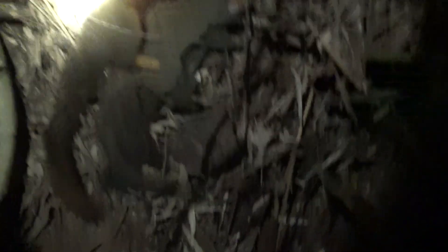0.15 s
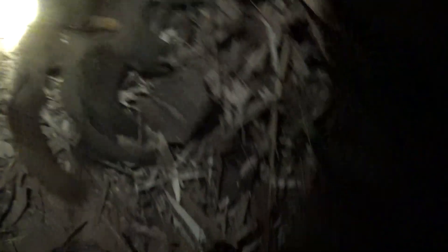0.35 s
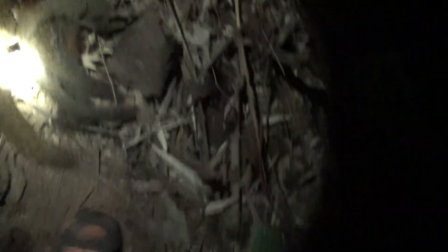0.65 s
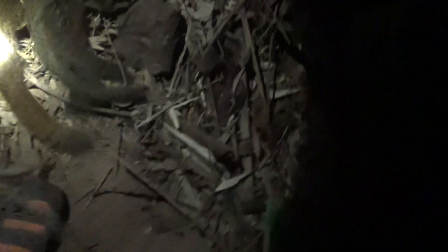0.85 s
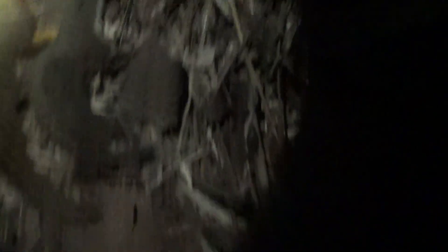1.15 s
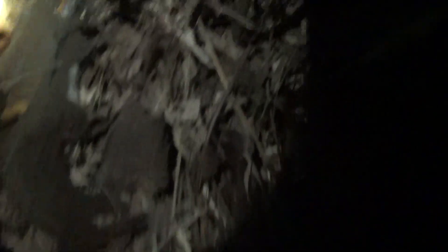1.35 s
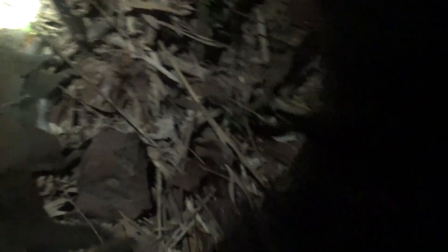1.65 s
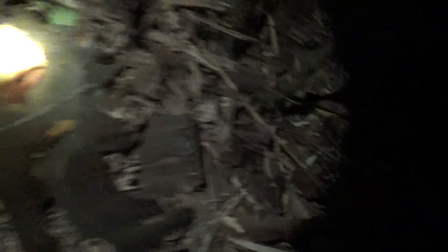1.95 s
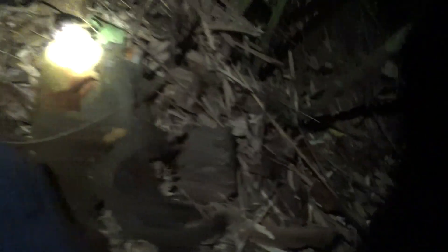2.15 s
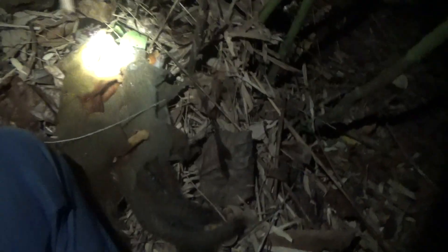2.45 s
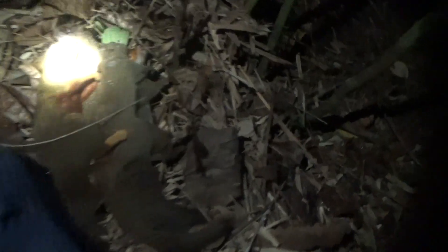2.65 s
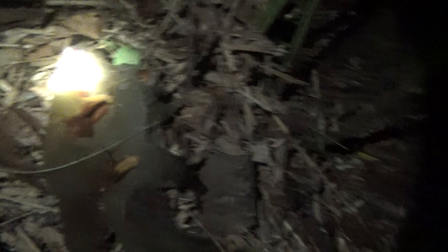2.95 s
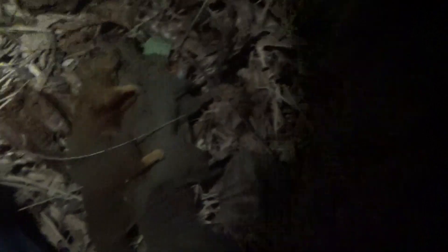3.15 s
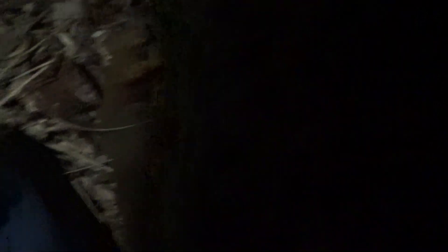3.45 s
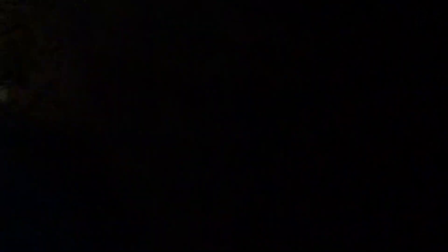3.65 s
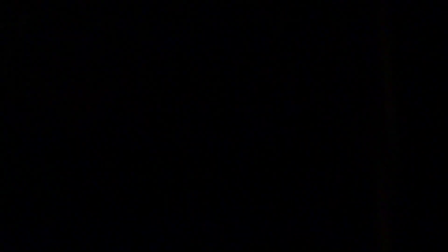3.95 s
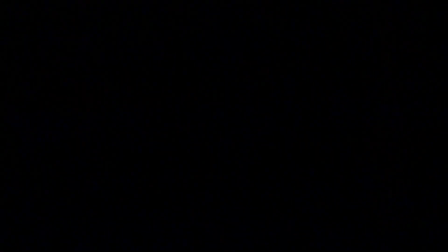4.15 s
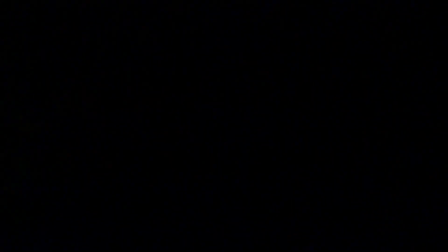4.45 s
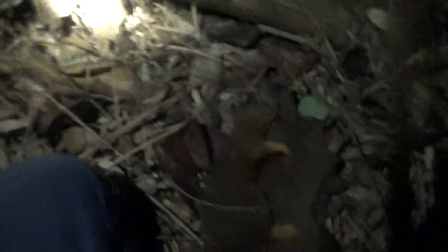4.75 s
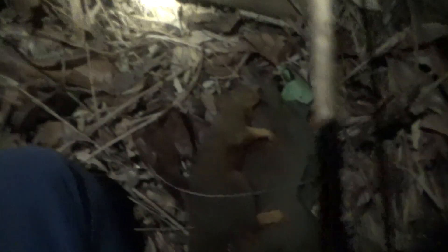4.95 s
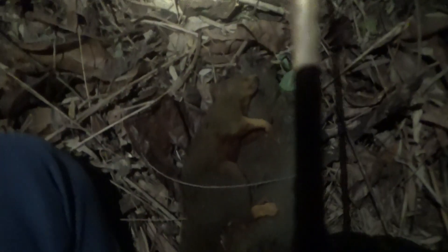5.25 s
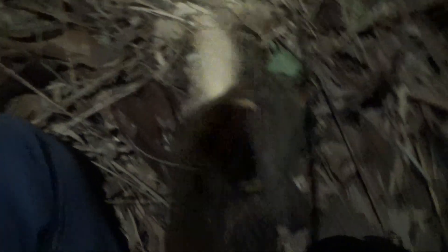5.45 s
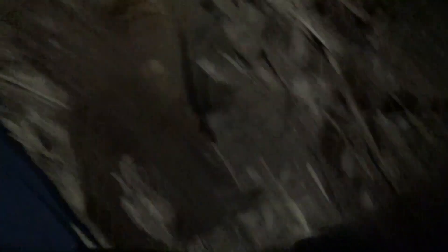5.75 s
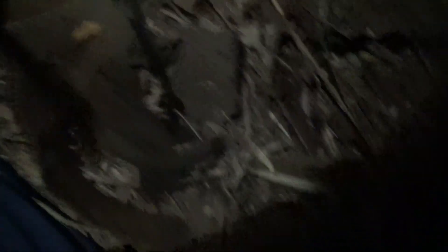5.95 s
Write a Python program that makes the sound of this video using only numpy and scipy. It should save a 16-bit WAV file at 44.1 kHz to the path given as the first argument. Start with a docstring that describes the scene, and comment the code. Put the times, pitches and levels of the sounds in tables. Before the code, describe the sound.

A night forest heard close to the ground in stereo. Crickets trill throughout, a bright, rapidly pulsing note around 4 to 5 kHz, swelling and dipping slightly, with a fainter slower chirr below and diffuse tree echoes. From 0 s dry leaf litter rustles in short, crowded bursts, crisp hiss mixed with crunch, as someone shifts about. Dull soft bumps come at 0.1-0.25 s; twig knocks cluster at 1.4-1.95 s, and the strongest crunches and rustles fall around 2.0-2.6 s. Around 3.0 s there is a tick and low bump, then a brief hollow scrape of a stick at 3.2-3.45 s with ringing stem taps. From 3.6 to 4.6 s the litter is nearly still, only tiny ticks under louder crickets. Muffled bumps and light rustling return at 5.0-5.35 s, and at 5.9-6.1 s leaves crunch sharply with knocks. Soft air and far insects lie beneath.

```python
"""Crickets trill throughout in a forest at night: wing strokes ring gliding tones, smeared by sparse tree echoes.
From the start dry leaf litter, grainy coloured noise, rustles in crowded bursts as someone shifts about,
with ticks, twig knocks, ringing stems and dull bumps, each a decaying resonance blurred by noise.
After three seconds a stick scrapes a hollow thing and the litter calms; towards the end it stirs again.
Far insects and air, a random spectrum with drifting patches, lie under it all."""
import sys
import numpy as np
from scipy import signal
from scipy.io import wavfile
from scipy.ndimage import uniform_filter1d

SR = 44100
rng = np.random.default_rng(int(sys.argv[2]) if len(sys.argv) > 2 else 0)


def int16_out(signal):
    """Quantize to a 16-bit WAV file."""
    q = np.round(np.clip(np.atleast_2d(signal).T, -1, 1) * 32767)
    wavfile.write(sys.argv[1], SR, q.astype(np.int16))


N = 269847
T = np.arange(N) / SR  # s


def gain_of(db):
    """Decibel law: 20 dB is a tenfold amplitude."""
    return 10 ** (np.asarray(db) / 20)


def evened(x):
    """Normalization to unit root-mean-square amplitude."""
    return x / np.sqrt(np.mean(x ** 2) + 1e-20)


def read(points, hz):
    """Interpolation of a spectrum along logarithmic frequency."""
    f, value = np.transpose(points)
    return np.interp(np.log(hz + 1), np.log(f + 1), value)


def columns(rows):
    """Linear interpolation of each column over the time in the first."""
    s, *rest = np.transpose(rows)
    return [np.interp(T, s, c) for c in rest]


def sides(db):
    """Stereo placing by level difference: gains of left and right, left louder by db."""
    return gain_of([db / 2, -db / 2])


def colour(x, spectrum):
    """Minimum-phase filtering: gives x a spectrum while clicks keep a sharp front."""
    log_gain = np.log(gain_of(read(spectrum, abs(np.fft.fftfreq(4096, 1 / SR)))))
    # the Hilbert transform of the log gain is the phase of a causal filter
    response = np.exp(np.conj(signal.hilbert(log_gain)))
    taps = np.fft.ifft(response).real[:2048]
    return evened(signal.oaconvolve(x, taps[None], axes=1)[:, :N])


def crickets():
    """Superposition of singers: a near chorus, a slower pair below and a faint high one, direct and echoed."""
    # near chorus: t/s, level/dB, leader against its neighbours/dB
    chorus = [(0.0, -20, 4), (0.46, -24, 2), (0.95, -26, 4), (1.45, -27.5, -9), (1.79, -19.5, 1),
              (2.11, -20.5, 2.5), (2.57, -17, 0.5), (2.99, -20.5, 2), (3.56, -21.5, 1.5), (3.78, -28, 2.5),
              (4.6, -17.5, 2.5), (5.03, -15.5, 1), (5.52, -16.5, 8.5), (5.68, -18.5, 1), (5.9, -20.5, -2),
              (6.12, -26.5, 9)]
    # neighbours singing in turn with the leader: delay/strokes, level/dB, pitch factor
    neighbours = [(.5, -1, .985), (.27, -5, .95), (.74, -5, 1.0), (.9, -6, .9)]
    # lone singers before their path gains: t/s, slow pair level/dB, high cricket level/dB
    others = [(0, -38, -32.5), (1.3, -33, -35), (2.5, -33.5, -37), (3.3, -36, -38), (4.3, -34, -32.5),
              (5.4, -30.5, -32), (6.12, -33, -34)]
    # chorus as the listener turns: t/s, top of the leader's note f/Hz, left over right/dB
    turn = [(0.2, 4750, 2), (1.4, 4695, 0), (2.2, 4776, -0.5), (3.6, 4739, -1), (4.5, 4700, 1.5),
            (5.4, 4759, .5), (5.9, 4710, 0)]
    # stepwise pace of the leader: from t/s, wing strokes per second
    pace = [(0, 37.38), (.6, 37.9), (1.2, 37.29), (2.1, 36.12), (2.7, 36.97), (3.3, 35.43), (3.6, 36.64),
            (4.8, 36.32), (5.4, 36.85)]
    level_db, leader_db = columns(chorus)
    slow_db, high_db = columns(others)
    top_hz, pan_db = columns(turn)
    since, per_s = np.transpose(pace)
    per_s_now = per_s[np.searchsorted(since, T, "right") - 1]
    strokes = .58 + np.cumsum(per_s_now) / SR  # part of a stroke is already made at the start

    song = dict(duty=.62, bend=2.3, slip=.012, uneven_db=1.48)
    leader = cricket(strokes, top_hz, drop_hz=598.6, octave_db=-16.5, **song)
    main = gain_of(leader_db) * leader * np.ones((2, 1))
    for behind, db, pitch in neighbours:
        drift = .15 * np.sin(2 * np.pi * (rng.uniform(.3, .7) * T + rng.random()))  # strokes
        voice = cricket(strokes + 1 - behind + drift, top_hz * pitch, drop_hz=800, octave_db=-17.5, **song)
        # an interaural delay of up to two samples places it
        main += gain_of(db) * np.array([voice, np.roll(voice, rng.integers(-2, 3))])
    echoes = trees(main, t60=0.4)
    main = main + gain_of(-2.5) * (echoes + 0.15 * echoes[::-1])
    running_rms = np.sqrt(uniform_filter1d((main ** 2).mean(0), 9000))
    main = main / running_rms * gain_of(level_db) * sides(pan_db)

    slow = cricket(11.9 * T + .45, 3430, drop_hz=150, duty=.85, bend=.4, early=1.0, flat=.4,
                   slip=.017, uneven_db=1.2)
    slow += .7 * cricket(12.6 * T, 3500, drop_hz=130, duty=.85, bend=.4, slip=.022)  # farther off
    high = cricket(strokes + .4, 5120, drop_hz=90, duty=.7, bend=1.2, slip=.009)
    lone = (slow * gain_of(slow_db) + high * gain_of(high_db))[None]
    return main + gain_of(-9.0) * lone + gain_of(-6.0) * trees(lone, t60=.6)


def cricket(strokes, top_hz, drop_hz, duty, bend=1.8, early=0.95, flat=0.54, slip=0.01989, uneven_db=3.0,
            octave_db=-40):
    """Stridulation: each closing of the wings rings a note that sags as the scraper slows, with a weak octave."""
    along = np.clip(strokes % 1 / duty, 0, 1)  # progress through the closing
    level_db, pitch = rng.standard_normal((400, 2))[np.floor(strokes).astype(int) + 2].T
    slips = evened(uniform_filter1d(rng.standard_normal(N), 40))  # the scraper crosses the teeth unevenly
    hz = (top_hz - drop_hz * along ** bend) * (1 + slip * (pitch / 3 + slips))
    turns = np.cumsum(hz) / SR
    shape = abs(np.sin(np.pi * along ** early)) ** flat * (along < 1)
    shape = shape * gain_of(uneven_db * level_db)
    octave = gain_of(octave_db) * (0.29 + along ** 2) * np.sin(4 * np.pi * turns)  # grows along the stroke
    return evened(shape * (np.sin(2 * np.pi * turns) + octave))


def trees(x, t60):
    """Scattering: sparse echoes of random sign off trunks and leaves, unlike in each ear, vary as one sways."""
    out = np.zeros((2, N))
    for k in range(3):  # three echo patterns, modulated in turn
        at = np.arange(100, SR // 3, 20) + rng.integers(0, 20, (2, (SR // 3 - 81) // 20))
        taps = np.zeros((2, SR // 3 + 20))
        echo = rng.choice([-1., 1.], at.shape) * gain_of(-60 * at / SR / t60)
        np.put_along_axis(taps, at, echo, 1)
        sway = np.sqrt(2 / 3) * np.cos(2 * np.pi * (.9 * T + k / 3))
        out += signal.oaconvolve(x * sway, taps / np.linalg.norm(taps[0]), axes=1)[:, :N]
    return out


def rustle():
    """Friction and fracture of leaves: crisp hiss and crunch, both with ringing cracks, and low scuff."""
    # spectra of crisp hiss, crunch and low scuff: f/Hz, relative level/dB
    hiss_spectrum = [(600, -56), (3000, -12.5), (5500, -7), (7000, -1.5), (8800, 4.5), (10500, -1),
                     (13000, -10.5), (15800, -17.5)]
    crunch_spectrum = [(200, -39), (600, -8.5), (1200, 0), (2000, 0), (3000, 0.5), (5000, -1.5), (8000, -3),
                       (15800, -46)]
    scuff_spectrum = [(25, -39), (60, -12.5), (180, -0.5), (380, 8), (600, -3), (1000, -3), (3000, -87)]
    chip_hz = np.geomspace(6000, 11000, 5)  # small chips that break off
    leaf_hz = np.geomspace(700, 3700, 7)  # leaves of different size
    hiss, crunch, scuff = stirred()
    crisp = colour(grains(6000, spread_db=7.0, apart=0.13), hiss_spectrum)
    crisp = crisp + gain_of(-8.5) * cracking(900, 5.0, chip_hz)
    crushed = colour(grains(3000, spread_db=4.5, apart=0.59), crunch_spectrum)
    crushed = crushed + gain_of(-3.5) * cracking(1800, 5.1, leaf_hz)
    crushed = crushed * gain_of(3.5) * sides(2.1)[:, None]
    scuffed = colour(grains(300, spread_db=1.5, apart=0.09), scuff_spectrum)
    return crisp * hiss + crushed * crunch + scuffed * scuff


def stirred():
    """Addition of powers: every stir swells to its peak and sinks again over the settling of the litter."""
    # stirs before the mix: peak t/s, rise/s, fall/s, hiss level/dB, crunch level/dB, scuff level/dB
    stirs = [(0.0, .05, 0.1, -22, -29.5, -58), (.13, 0.13, 0.22, -30, -36.5, -80),
             (.26, 0.11, 0.051, -25.5, -28, -32), (.34, 0.094, 0.091, -29.5, -35, -41.5),
             (0.542, 0.11, 0.072, -22, -27, -38), (.7, 0.16, 0.6, -26, -33, -45),
             (0.861, 0.12, 0.071, -27.5, -24, -31.5), (1.29, 0.33, 0.16, -23, -33, -63),
             (1.7, 0.035, 0.049, -28, -30, -40), (1.791, 0.028, 0.023, -51, -27, -34),
             (2.01, 0.06, 0.068, -24, -20, -36.5), (2.14, 0.15, 0.12, -36, -27.5, -32),
             (2.26, 0.36, 0.051, -30, -30, -35), (2.436, 0.13, 0.1, -16.5, -25.5, -31.5),
             (2.58, 0.073, 0.083, -20, -26, -32), (2.76, 0.12, 0.1, -28.5, -33.5, -41.5),
             (2.89, 0.071, 0.19, -30.5, -34.5, -36.5), (3.02, 0.067, 0.11, -33.5, -36, -48),
             (3.22, 0.24, 0.18, -57, -37.5, -41.5), (3.7, 0.086, 0.41, -59, -55, -39),
             (3.95, 0.19, 0.39, -49, -40, -60), (4.67, 0.043, 0.2, -37.5, -45.5, -48),
             (5.17, 0.4, 0.26, -33.5, -38.5, -41.5), (5.332, 0.028, 0.027, -45, -31.5, -27.5),
             (5.499, 0.019, 0.053, -49, -36, -49), (5.87, 0.2, 0.052, -34.5, -35, -36.5),
             (6.047, 0.016, 0.072, -25, -21.5, -29.5)]
    # faint settling between stirs before the mix: t/s, hiss level/dB, crunch level/dB, scuff level/dB
    settling = [(.4, -56, -50, -41), (1.0, -35.5, -42.5, -45.5), (1.9, -33, -38, -44), (3.1, -47, -44, -47),
                (4.4, -41.5, -53, -59), (5.5, -42.5, -49, -54.5), (6.12, -35, -44, -39)]
    drop_db, roundness = 19.5, 1.505  # drop one rise or fall time from the peak; 1 = pointed, 2 = round
    power = gain_of(columns(settling)) ** 2
    for s, rise_s, fall_s, *peak_db in stirs:
        away = np.where(T < s, (s - T) / rise_s, (T - s) / fall_s)
        envelope = gain_of(-drop_db * away ** roundness)
        power = power + gain_of(peak_db)[:, None] ** 2 * envelope ** 2
    return np.sqrt(power)


def unequal_snaps(per_s, spread_db):
    """Random impulse process: independent snaps of very unequal size."""
    size_db = spread_db * np.minimum(rng.exponential(1, N), 3.2)
    return (rng.random(N) < per_s / SR) * rng.standard_normal(N) * gain_of(size_db)


def grains(per_s, spread_db, apart):
    """Granular friction: tiny snaps over a smooth rub, with a part that is uncorrelated between the ears."""
    both = evened(unequal_snaps(per_s, spread_db)) + 0.8 * rng.standard_normal(N)
    return both + apart * rng.standard_normal((2, N))


def cracking(per_s, spread_db, notes):
    """Impulse excitation of resonators: sparse cracks each ring briefly at one of the notes."""
    size = unequal_snaps(per_s, spread_db)
    piece, out = rng.integers(0, len(notes), N), 0
    for k, hz in enumerate(notes):
        ring = signal.iirpeak(hz, 2.83, fs=SR)
        out = out + signal.lfilter(*ring, signal.lfilter(*ring, size * (piece == k)))
    return evened(out)


def leaf_ticks():
    """Brittle fracture: leaf ticks ring high, brief and noisy."""
    # ticks before filtering: t/s, level/dB, centre f/Hz
    ticks = [(0.0105, -11.5, 9850), (0.267, -6, 5700), (1.167, -6, 8700), (1.207, -7, 9400),
             (1.415, -11, 6900), (1.423, -7.5, 8460), (1.9497, -8.5, 9550), (2.904, -10, 8700),
             (2.941, -9, 8600), (2.9692, -1, 8590), (3.2054, -7.5, 9500), (3.2165, -14, 8650),
             (3.239, -11.5, 9550), (3.265, -8.5, 7800), (3.8076, -9, 9800), (4.0974, -14, 6360),
             (4.124, -14, 8060), (4.2446, -11, 8900), (4.9686, -16, 6870), (5.152, -9, 7250),
             (5.154, -3.5, 8750), (5.223, -8.5, 9100), (5.291, -11.5, 7770), (5.875, -14, 9300),
             (5.9236, -3, 8700), (5.9484, -16, 5700), (6.0232, -8, 6160), (6.108, -9, 5760)]
    return hits(ticks, noisy=1.8, rise_s=.0002, cycles=55., top=1.1, pan_db=-.3)


def twig_knocks():
    """Impact excitation: twigs knocked or snapped ring behind a broad crack."""
    # knocks before filtering: t/s, level/dB, ring f/Hz
    knocks = [(.692, -19, 1240), (.71, -16.5, 1730), (0.8513, -11, 1070), (1.4305, -10.5, 2700),
              (1.4744, -20, 1750), (1.7034, -20, 1560), (1.7513, -8.5, 2250), (1.7718, -12, 2570),
              (1.7877, -12, 2080), (1.7978, -15.5, 920), (1.8646, -14, 3020), (1.941, -3, 3340),
              (2.6268, -18, 1950), (2.944, -17.5, 1130), (3.0244, -11, 2930), (3.199, -18, 1740),
              (3.2245, -12, 2200), (3.292, -24, 1910), (3.3377, -23, 2120), (5.176, -13.5, 2530),
              (5.334, -20, 920), (5.485, -19.5, 2000), (5.9238, -12, 1690), (5.9493, -16, 2140),
              (6.023, -8, 2130), (6.027, -11, 880), (6.041, -10, 2260), (6.056, -20, 1460),
              (6.108, -14, 2220)]
    return hits(knocks, noisy=.8, rise_s=0.0002, cycles=22.0, top=2.5, pan_db=4.0, crack_db=-9)


def stem_taps():
    """Light damping: hollow dry stems ring clearly when tapped."""
    # taps before filtering: t/s, level/dB, ring f/Hz
    stems = [(1.4455, -14.5, 1660), (3.2698, -7, 1830), (3.4515, -11.5, 2600), (3.5128, -9, 2440),
             (4.063, -10.5, 3080)]
    return hits(stems, noisy=.15, rise_s=0.0003, cycles=40.0, top=2.5, pan_db=3.0, crack_db=-6)


def dull_bumps():
    """Soft contact: bumps of the hand and of feet on soil start slowly and ring low."""
    # bumps before filtering: t/s, level/dB, f/Hz
    bumps = [(.13, -14.5, 468), (.24, -15, 432), (.88, -34, 35), (1.57, -34, 90), (1.793, -17.5, 555),
             (3.02, -12, 504), (3.2, -27, 79.5), (3.94, -29, 65.6), (4.813, -28.5, 279),
             (4.968, -15.5, 385), (5.155, -18, 433), (5.282, -15, 360), (5.296, -18, 205),
             (5.316, -13, 301.4), (5.8, -24, 360), (5.95, -23, 40), (6.055, -9, 328)]
    return hits(bumps, noisy=2.22, rise_s=0.0061, cycles=14.6, top=4.3, pan_db=1.3)


def hits(rows, noisy, rise_s, cycles, pan_db, top=2.2, crack_db=-60):
    """Damped resonance: each hit rings a note blurred by a burst of noise; a short broad crack opens it."""
    out, t = np.zeros(N + 8000), np.arange(8000) / SR
    for (s, db, hz), noise in zip(rows, rng.standard_normal((len(rows), 8000))):
        burst = evened(uniform_filter1d(noise, max(1, int(SR / hz / 2))))
        tone = np.sin(2 * np.pi * hz * t) + noisy * burst * np.cos(2 * np.pi * hz * t)
        # the added 150 Hz makes low notes die within fewer cycles
        decay = gain_of(db - 60 * t * (hz + 150) / cycles)
        ring = tone * (1 - np.exp(-t / rise_s)) * decay
        band = signal.butter(2, [hz / 2, min(hz * top, SR / 3)], "band", fs=SR)
        crack = noise * gain_of(db + crack_db - 60 * t / 0.003)
        out[round(s * SR):][:8000] += signal.lfilter(*band, ring) + crack
    return sides(pan_db)[:, None] * out[:N]


def scrape():
    """Stick-slip: uneven slips of a stick dragged over a hollow thing excite one resonance."""
    # scrape: t/s, level/dB
    scrape_level = [(3.0, -90), (3.2, -43), (3.35, -29.5), (3.45, -51), (3.5, -90)]
    slips = grains(400, spread_db=9.0, apart=0.37)
    ringing = evened(signal.lfilter(*signal.iirpeak(1800, 4.5, fs=SR), slips))
    return ringing * gain_of(columns(scrape_level)[0])


def night():
    """Partly coherent diffuse field: far insects and air as random short-time spectra with drifting patches."""
    # night air: f/Hz, relative level/dB
    night_spectrum = [(20, -12), (40, 8), (170, 11), (630, 12), (3000, 2.5), (5500, 5), (6500, -3),
                      (9000, -64)]
    # coherence of the ears: f/Hz, left-right likeness (0 to 1)
    likeness = [(60, 1), (380, 0.7), (950, 0.22), (2380, 0.31), (5980, 0.074), (15000, 0.95)]
    frames, hz = N // 256 + 5, np.fft.rfftfreq(1024, 1 / SR)
    a, b, c, d, patches = rng.standard_normal((frames, 513, 5)).T
    patches = evened(uniform_filter1d(uniform_filter1d(patches, 12, 0), 14, 1))
    same = np.clip(read(likeness, hz), -1, 1)[:, None]
    left = a + 1j * b
    right = same * left + np.sqrt(1 - same ** 2) * (c + 1j * d)
    level_db = read(night_spectrum, hz)[:, None] + 1.9 * patches
    z = np.array([left, right]) * gain_of(level_db)
    air = signal.istft(z, nperseg=1024, noverlap=768)[1][:, :N]
    return gain_of(-43.5) * evened(air)


def scene():
    """Linear superposition of all sources; short echoes follow the snaps."""
    snaps = leaf_ticks() + twig_knocks() + stem_taps()
    snaps = snaps + gain_of(-8) * trees(snaps, t60=.025)
    return crickets() + rustle() + snaps + dull_bumps() + scrape() + night()


def record(dry):
    """Saturation and band limiting: peaks clip at full scale, then a low-pass removes the extreme treble."""
    low_pass = signal.firwin(511, 15900, window=("kaiser", 9), fs=SR)  # edge in Hz
    return signal.oaconvolve(np.clip(dry, -1, 1), low_pass[None], "same")


dry = scene()
out = record(dry)
int16_out(out)
```